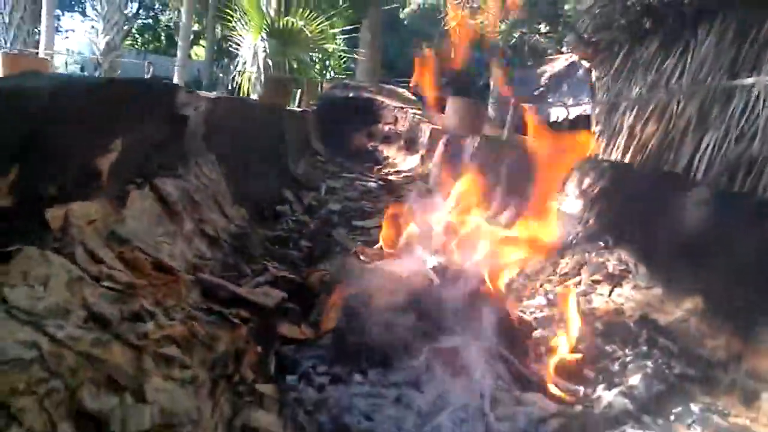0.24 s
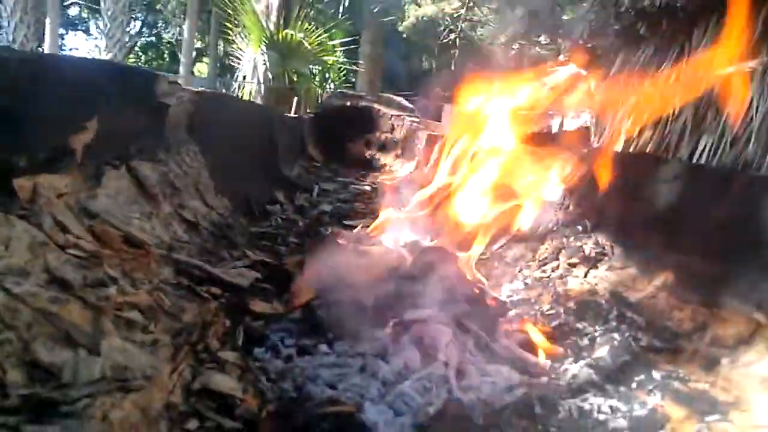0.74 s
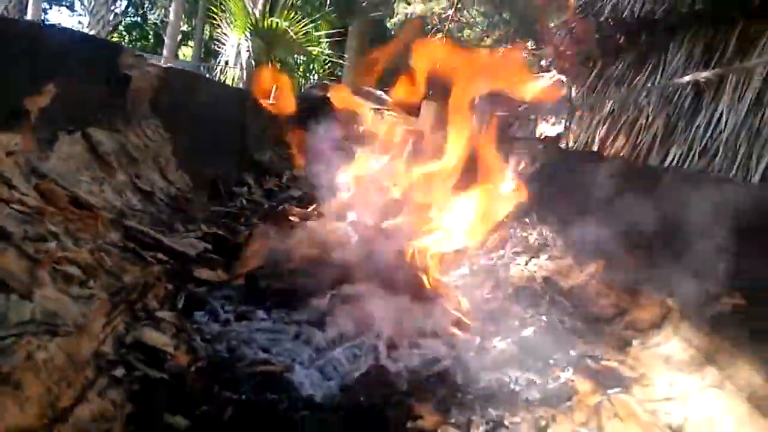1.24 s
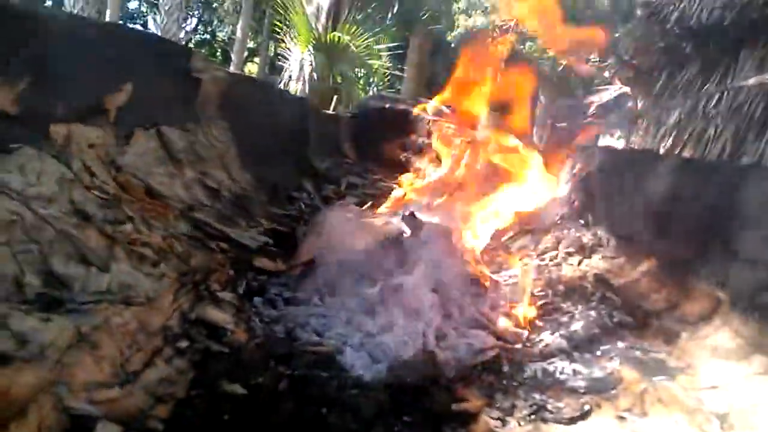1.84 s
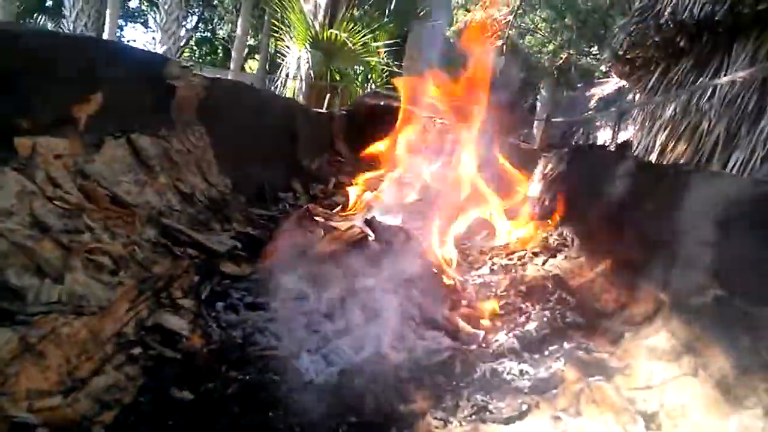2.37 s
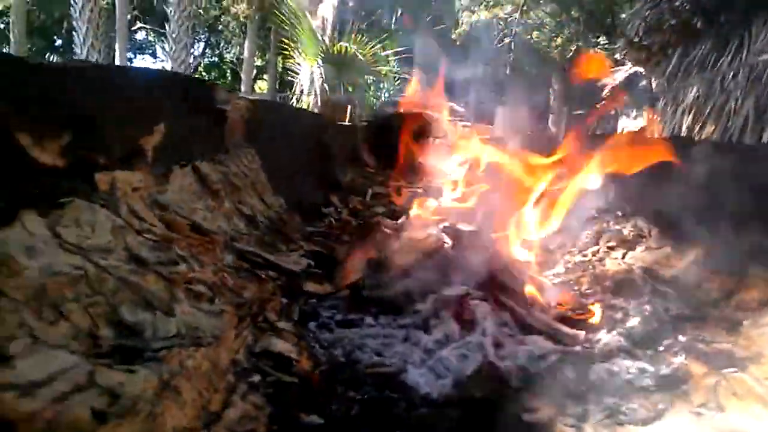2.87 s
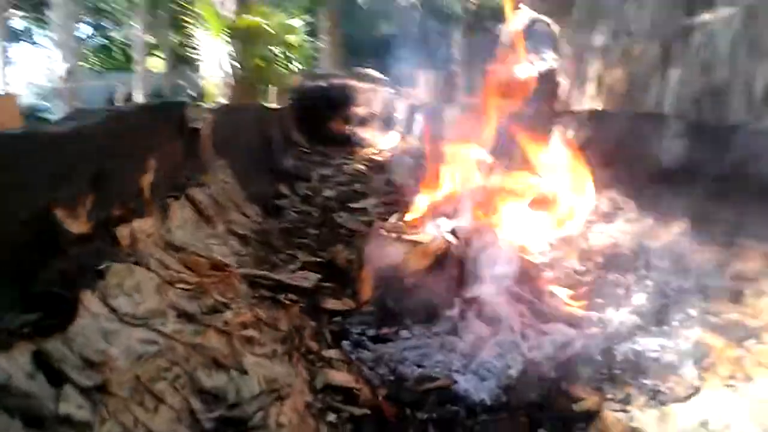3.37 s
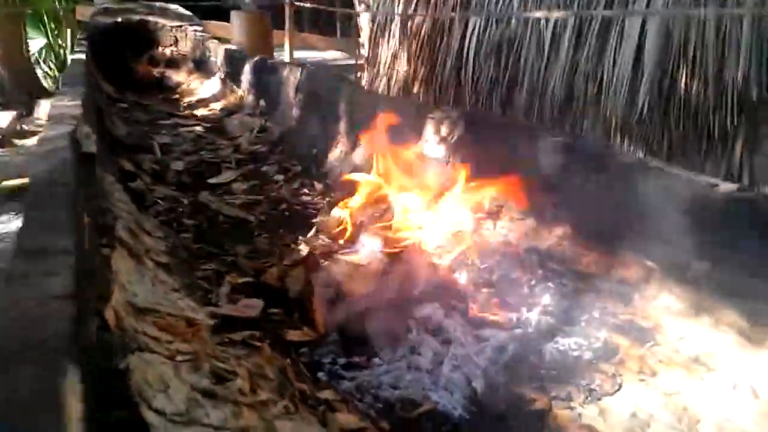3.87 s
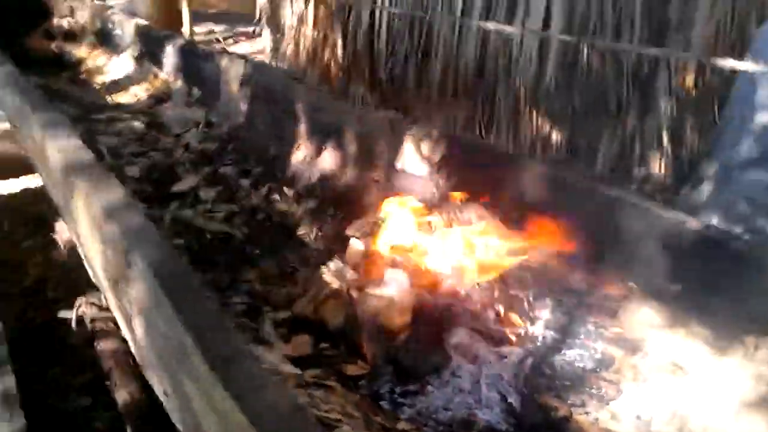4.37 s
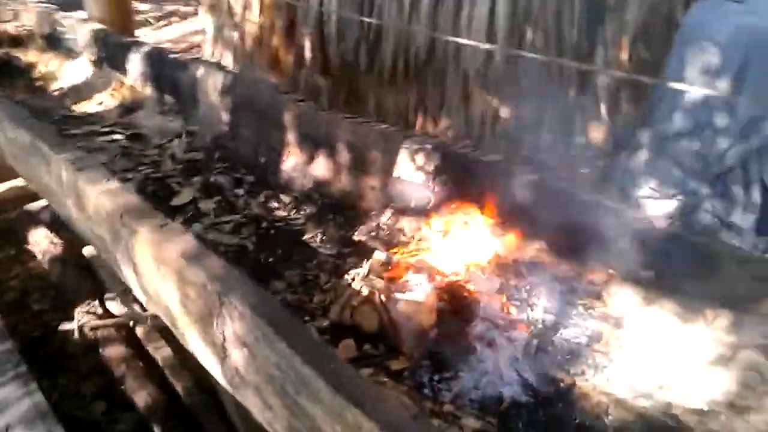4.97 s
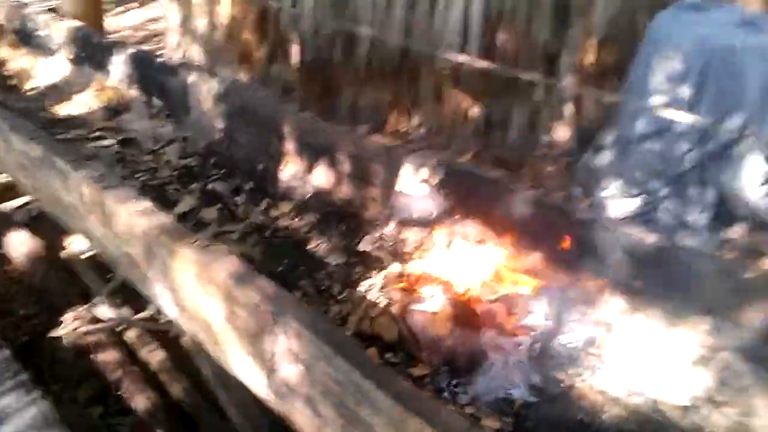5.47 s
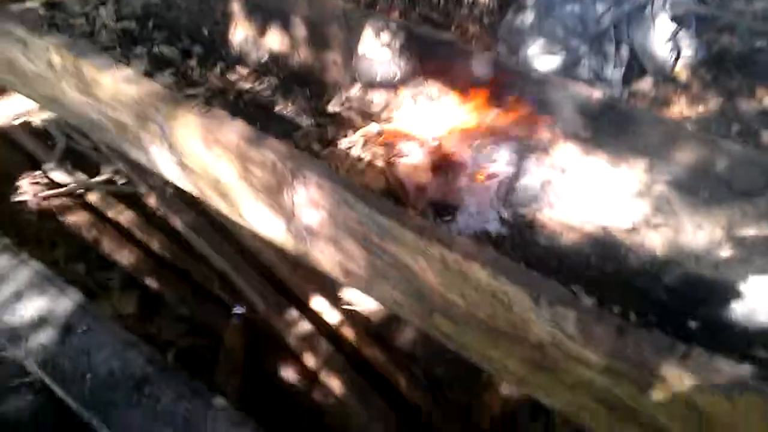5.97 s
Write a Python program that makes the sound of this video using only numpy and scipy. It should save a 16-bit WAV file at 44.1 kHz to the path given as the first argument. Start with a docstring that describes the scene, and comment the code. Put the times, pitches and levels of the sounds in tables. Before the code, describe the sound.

Outdoors among trees, a dense high cicada buzz dominates throughout, fluttering about ten times a second over distant insect hiss and faint leaves. Faint falling cheeps come first, then soft, low puffs of flame from a small fire. Near the end there is a far dove-like hoot, dry wood cracks, a swell in the buzz and a quick cluster of bumps on the handheld microphone.

```python
"""From the first moment two near cicadas throb about eleven and nine times a second, in and out of step, over
a steady chorus of clicking drums; far insects and foliage (shaped noise) and a small fire sound throughout.
The fire is rumbling noise and dull pulses; faint cheeps (falling sines) come early, then the stronger flaps.
Near the end come one long far hoot, perhaps a dove's (a wavering sine), snaps of wood (short noise bursts)
and the hand bumping and rubbing the microphone's case (damped thuds and ticks)."""
import sys
import numpy as np
from scipy import signal
from scipy.fft import rfft, irfft, next_fast_len
from scipy.io import wavfile
from scipy.ndimage import map_coordinates

SR = 44100
rng = np.random.default_rng(int(sys.argv[2]) if len(sys.argv) > 2 else 0)


def store_wav(level_fs):
    """Save 16-bit WAV to argv[1]."""
    pcm = np.round(np.clip(np.atleast_2d(level_fs), -1, 1) * 32767)
    wavfile.write(sys.argv[1], SR, pcm.T.astype(np.int16))


N = 274293


def from_db(db):
    """Decibels to gain."""
    return 10 ** (np.asarray(db) / 20)


def rms_one(x):
    """Scale to unit power."""
    return x / np.sqrt(np.mean(x ** 2) + 1e-20)


def peak_one(x):
    """Scale to unit height."""
    return x / (np.abs(x).max() + 1e-20)


def in_time(rows):
    """Draw each column of a timed table as a curve with a value at every sample."""
    s, *columns = np.transpose(rows)
    return [np.interp(np.arange(N) / SR, s, c) for c in columns]


def add(out, s, sound):
    """Mix a short sound in at time s."""
    i = int(np.clip(round(s * SR), 0, N - 1))
    out[i:i + len(sound)] += sound[:N - i]


def white():
    """White noise for the whole scene."""
    return rng.standard_normal(N)


def colour(x, spectrum):
    """Causal (minimum-phase) filter with the given spectrum."""
    size = next_fast_len(2 * (len(x) // 2) + 8192, real=True) // 2 * 2
    hz, db = np.transpose(spectrum)
    bins = np.maximum(np.arange(size // 2 + 1) * SR / size, 1)
    skirt_db = -40 * np.maximum(np.log2(hz[0] / bins), 0)  # 40 dB per octave below the first point
    gain_db = np.interp(np.log(bins), np.log(hz), db) + skirt_db
    # folding the cepstrum onto positive time makes the phase minimal
    cepstrum = irfft(np.log(from_db(gain_db)))
    cepstrum[1:size // 2] *= 2
    cepstrum[size // 2 + 1:] = 0
    response = np.exp(rfft(cepstrum))
    return irfft(rfft(x, size) * response)[:len(x)]


def drift(per_s):
    """Random wander of unit power: straight lines between per_s random knots a second."""
    knots = rng.standard_normal(4000)
    return rms_one(np.interp(np.arange(N) / SR * per_s, np.arange(len(knots)), knots))


def uneven_sizes(spread_db, deviates):
    """Click strengths of random size and either sign."""
    return from_db(spread_db * np.clip(deviates, -2, 2)) * rng.choice([-1, 1], len(deviates))


def grains(per_s, spread_db):
    """Clicks at random moments, of uneven size and either sign."""
    born = rng.random(N) < per_s / SR
    return born * uneven_sizes(spread_db, rng.standard_normal(N))


def crack(low_hz, high_hz, t60, splinter=1.0):
    """A sharp break with a short splintering tail, in one band; height 1."""
    t = np.arange(4096) / SR
    tail = splinter * rng.standard_normal(len(t)) * from_db(-60 * t / t60)
    band = signal.butter(2, [low_hz, high_hz], "band", fs=SR, output="sos")
    return peak_one(signal.sosfilt(band, (t == 0) + tail))


def thicket(x, count, echo_db, lag_s, sway_s):
    """Close reflections off the ground and logs comb the sound; their paths shift as the hand sways."""
    n, out = np.arange(N), x
    for k in range(count):
        lag = lag_s * (k + 1) ** 1.3 + sway_s * drift(5)
        out = out + from_db(echo_db) * map_coordinates(x, [n - lag * SR], order=3)
    return rms_one(out)


def tymbals(tone, count, ribs_per_s, jitter, uneven_db):
    """Each drum buckles rib by rib in a quick, loose run of clicks that sets the belly ringing."""
    clicks = np.zeros(N)
    for _ in range(count):
        gap, size = rng.standard_normal((2, 12000))
        at = (np.cumsum(np.exp(jitter * gap)) / ribs_per_s * SR).astype(int)
        strength = uneven_sizes(uneven_db, size)
        clicks += np.bincount(at[at < N], strength[at < N], N)
    return colour(clicks, tone)


# shape of every throb [shares of a beat]
THROB_RISE, THROB_HOLD, THROB_FALL = 0.25, 0.28, 0.27


def cicada(course, per_s, tone, ribs_per_s, gain_db, uneven_db=1.5, waver_db=0.67):
    """One near insect switches its buzz on and off once a beat; no two throbs are quite as strong."""
    lag_s, level_db = in_time(course)
    beats = per_s * (np.arange(N) / SR - lag_s) + .5
    phase, beat = beats % 1, np.maximum(beats, 0).astype(int)
    start = (1 - THROB_RISE - THROB_HOLD - THROB_FALL) / 2  # silence is split evenly around the throb
    rise, fall = (phase - start) / THROB_RISE, (1 - start - phase) / THROB_FALL
    throb = np.clip(np.minimum(rise, fall), 0, 1)
    beat_db = uneven_db * np.tanh(rng.standard_normal(beat.max() + 1))[beat]
    strength_db = beat_db + waver_db * drift(110)
    buzz = tymbals(tone, count=2, ribs_per_s=ribs_per_s, jitter=.3, uneven_db=2.5)
    buzz = thicket(buzz, count=3, echo_db=-10.0, lag_s=.0014, sway_s=.00008)
    return throb * from_db(level_db + gain_db + strength_db) * buzz


# course of each near cicada: (time [s], lag behind its beat [s], level before trim [dB])
QUICK_COURSE = [(0.0, 0.0082, -21), (0.8, 0.044, -21.5), (1.6, 0.056, -24), (2.65, 0.068, -18.5),
                (3.7, 0.067, -22.5), (4.1, 0.067, -26), (4.7, 0.064, -24), (5.0, 0.056, -17.5),
                (5.4, 0.065, -22), (5.85, 0.06, -13.5), (6.22, 0.06, -17)]
SLOW_COURSE = [(0.0, -0.055, -22.5), (1.6, -0.038, -20.5), (2.3, 0.00084, -25.5), (3.1, -0.051, -23),
               (3.7, -0.052, -21.5), (4.1, -0.048, -26), (4.7, -0.055, -25), (5.0, -0.063, -18),
               (5.4, -0.053, -21), (6.22, -0.048, -21.6)]
# ring of each one's drum and belly: (frequency [Hz], relative level [dB])
QUICK_RING = [(4000, -54), (5600, -29.5), (6000, -23), (6500, -12), (7000, -4), (7300, 1.5), (7900, 0.5),
              (8300, -3), (8650, -3.5), (9300, -8), (10600, -19), (13300, -27), (15600, -20.5)]
SLOW_RING = [(4000, -53), (5700, -29.5), (6500, -16.5), (7100, -3.5), (7700, 3), (8300, -2), (8700, 1.5),
             (9300, -6.5), (10600, -21.5), (13000, -21.5), (15600, -16)]


def near_cicadas():
    """In step, the two near insects pulse hard; out of step, they blur into an even buzz."""
    quick = cicada(QUICK_COURSE, per_s=11.4, tone=QUICK_RING, ribs_per_s=800, gain_db=0.8)
    slow = cicada(SLOW_COURSE, per_s=9.2, tone=SLOW_RING, ribs_per_s=760, gain_db=0.4)
    return quick + slow


# the chorus behind them: (time [s], level before trim [dB])
CHORUS_COURSE = [(0, -25.5), (1.7, -24), (2.5, -26.5), (3.7, -23.5), (4.7, -24.5), (5.0, -21.5),
                 (6.22, -21.5)]
# ring of the chorus: (frequency [Hz], relative level [dB])
CHORUS_RING = [(4000, -47.5), (5800, -24.5), (6500, -13.5), (7200, 0.5), (7900, -0.5), (8700, -3.5),
               (9500, -8), (10800, -16), (13500, -21), (15600, -18.5)]


def chorus(trim_db=-0.63, swell_db=1.0):
    """Many insects farther off merge into a steady buzz that fills the gaps."""
    level_db, = in_time(CHORUS_COURSE)
    crowd = tymbals(CHORUS_RING, count=4, ribs_per_s=600, jitter=.4, uneven_db=0.5)
    crowd = thicket(crowd, count=3, echo_db=-7.5, lag_s=.0019, sway_s=.00008)
    return from_db(level_db + trim_db + swell_db * drift(60)) * crowd


# how squarely the microphone faces the cicadas: (time [s], top treble gain [dB])
MIC_FACING = [(0, -1.5), (1.8, 1), (3.5, -1.5), (5.0, 0.5), (5.45, 0), (5.8, -4.5), (6.22, -3)]


def turned(x, corner_hz=10300):
    """The case shades the shortest waves as the hand turns it away."""
    facing_db, = in_time(MIC_FACING)
    top = signal.sosfiltfilt(signal.butter(4, corner_hz, "high", fs=SR, output="sos"), x)
    return x + (from_db(facing_db) - 1) * top


# the fire: (time [s], rumble level before trim [dB], flutter level before trim [dB])
FIRE_COURSE = [(0.0, -32.5, -32.5), (0.7, -34, -37.5), (1.3, -34.5, -37.5), (1.8, -33.0, -30.5),
               (2.6, -35.5, -36.5), (3.2, -33.5, -32.5), (3.7, -34, -34), (4.3, -35.5, -37),
               (5.0, -36, -42), (5.6, -36.5, -37), (6.22, -35.5, -45)]
# colour of the rumble, and of one flap of flame: (frequency [Hz], relative level [dB])
RUMBLE_COLOUR = [(12, 2), (25, 0), (60, 0.5), (80, -4), (110, -1.5), (170, -12), (300, -30), (700, -51)]
FLAP_COLOUR = [(30, -6), (80, -3.5), (140, 0.5), (230, -2.5), (320, -6.5), (450, -13.5), (700, -24),
               (1200, -37.5), (2500, -40.5)]
# the strongest flaps of flame: (time [s], peak level before trim [dB])
STRONG_FLAPS = [(1.556, -21.5), (1.751, -22), (2.092, -20.5), (2.279, -21.5), (2.993, -22.5), (3.298, -21),
                (3.723, -23.5), (3.916, -25)]


def flames(rumble_trim_db=-1.0, flutter_trim_db=-3.0, flap_trim_db=1.5, gust_db=2.0):
    """Rising hot gas rumbles; each tongue of flame that tears off gives a dull pressure pulse."""
    rumble_db, flutter_db = in_time(FIRE_COURSE)
    rumble = rms_one(colour(white(), RUMBLE_COLOUR))
    tongues = grains(per_s=420, spread_db=4.0) * from_db(gust_db * drift(20))
    flutter = rms_one(colour(tongues, FLAP_COLOUR))
    out = from_db(rumble_db + rumble_trim_db) * rumble + from_db(flutter_db + flutter_trim_db) * flutter
    pulse = peak_one(colour(signal.unit_impulse(4096), FLAP_COLOUR))
    for s, db in STRONG_FLAPS:
        add(out, s, -from_db(db + flap_trim_db) * pulse)
    return out


# snapping wood: (time [s], peak level [dB], low edge [Hz], high edge [Hz], 60 dB decay of the tail [s])
WOOD_SNAPS = [(4.6515, -6.5, 3500, 10100, 0.0017), (4.9816, -0.5, 4950, 12600, 0.0042),
              (5.548, -26, 302, 1400, 0.084), (5.906, -22, 477, 1520, 0.0071)]


def snaps():
    """Sticks split in the heat, each with a sharp crack and a splintering tail."""
    out = np.zeros(N)
    for s, db, low_hz, high_hz, t60 in WOOD_SNAPS:
        add(out, s, from_db(db) * crack(low_hz, high_hz, t60))
    return out


# the hand bumps and slips on the case:
# (time [s], thud level [dB], thud pitch [Hz], tick level [dB], tick centre [Hz])
HAND_BUMPS = [(4.848, -34, 45, -26, 900), (4.858, -19, 48, -26, 595), (4.859, -18.5, 266, -40, 520),
              (5.355, -23.5, 207, -48, 500), (6.132, -19, 171.2, -17.5, 1457),
              (6.139, -14, 163, -18.5, 1600), (6.151, -16, 140, -16, 1900), (6.159, -15, 146, -26, 1290),
              (6.1655, -16, 171, -19.5, 1300), (6.172, -22, 130, -20, 1000)]


def handling(ring_cycles=2.3, tick_spread=2.6):
    """Each slip of the hand gives a tick and a heavily damped thud of the case."""
    out, t = np.zeros(N), np.arange(4096) / SR
    for s, thud_db, hz, tick_db, tick_hz in HAND_BUMPS:
        decay = np.exp(-np.log(1000) * t * hz / ring_cycles)  # down 60 dB after ring_cycles
        thud = peak_one(np.sin(2 * np.pi * hz * t) * decay)
        tick = crack(tick_hz / tick_spread, tick_hz * tick_spread, t60=0.012)
        add(out, s, from_db(tick_db) * tick - from_db(thud_db) * thud)
    return out


# the far hoot: (time [s], pitch [Hz], level [dB])
HOOT_COURSE = [(4.6, 528, -63), (4.76, 523, -52), (4.95, 518, -50.5), (5.2, 521, -50.5), (5.47, 521, -54),
               (5.55, 542, -71)]


def hoot(waver_hz=0.9, waver_db=1.0):
    """One long, soft, nearly pure note from far among the trees."""
    hz, level_db = in_time(HOOT_COURSE)
    phase = 2 * np.pi * np.cumsum(hz + waver_hz * drift(17)) / SR
    return np.sqrt(2) * from_db(level_db + waver_db * drift(23)) * np.sin(phase)


# faint far cheeps: (time [s], length [s], start pitch [Hz], end pitch [Hz], level at the crest [dB])
FAR_CHEEPS = [(0.095, 0.12, 3430, 3280, -47), (0.158, 0.091, 3230, 3130, -42.5),
              (1.419, 0.14, 1520, 1470, -51.5)]


def cheeps(warble_hz=70):
    """Short falling whistles, blurred by distance: sines with a quick random warble."""
    out = np.zeros(N)
    for s, length, start_hz, end_hz, db in FAR_CHEEPS:
        size = int(length * SR)
        hz = np.linspace(start_hz, end_hz, size) + warble_hz * drift(250)[:size]
        whistle = np.sqrt(2) * np.sin(2 * np.pi * np.cumsum(hz) / SR)
        add(out, s, from_db(db) * np.hanning(size) * whistle)
    return out


# the wood: (time [s], far insects' level before trim [dB], foliage level before trim [dB])
WOOD_COURSE = [(0.0, -41, -55), (1.3, -40.9, -55), (1.8, -41, -49.5), (2.5, -41.5, -54.5),
               (3.3, -41, -54.5), (4.0, -40.0, -49), (4.8, -38, -46.5), (5.5, -37.5, -47.5),
               (6.22, -35.8, -45.5)]
# colour of the far insects, and of the foliage: (frequency [Hz], relative level [dB])
INSECT_COLOUR = [(1600, -23), (2050, -14.5), (2350, -1.5), (2630, 3.5), (2900, 1.5), (3300, 2), (3500, 1),
                 (3750, 3), (4100, 2), (4500, 6), (4850, 6.5), (5300, 2), (6500, -0.5), (9000, -9.5)]
LEAF_COLOUR = [(300, -13.5), (550, 0.5), (900, 2), (1300, -1), (2000, 0.5), (3000, -10), (6000, -26)]


def wood(insects_trim_db=-1.5, leaves_trim_db=-2.5, stir_db=2.8, hush_db=5.0):
    """Distant insects merge into a hiss; beneath it the foliage stirs unevenly."""
    insects_db, leaves_db = in_time(WOOD_COURSE)
    insects = thicket(colour(white(), INSECT_COLOUR), count=3, echo_db=-9.5, lag_s=.0021, sway_s=.00012)
    stirring_db = stir_db * np.tanh(drift(16)) + hush_db * np.tanh(drift(40))
    leaves = rms_one(from_db(stirring_db) * colour(white(), LEAF_COLOUR))
    return from_db(insects_db + insects_trim_db) * insects + from_db(leaves_db + leaves_trim_db) * leaves


def scene():
    """Everything reaches one microphone, so both channels are alike."""
    cicadas = turned(near_cicadas() + chorus())
    mono = cicadas + flames() + snaps() + handling() + hoot() + cheeps() + wood()
    return np.array([mono, mono])


# colour of a faint noise that differs between left and right: (frequency [Hz], relative level [dB])
SIDE_NOISE_COLOUR = [(40, -8), (500, -4), (1200, -36), (2600, 5), (5000, 12.5), (7500, -23), (11000, -8),
                     (15500, 10)]


def record(dry, noise_db=-53, cutoff_hz=15700):
    """A faint coloured noise, different in each channel, is added; the top is cut steeply."""
    noise = np.array([rms_one(colour(white(), SIDE_NOISE_COLOUR)) for _ in dry])
    steep_cut = signal.ellip(16, .1, 100, cutoff_hz, fs=SR, output="sos")
    return signal.sosfilt(steep_cut, dry + from_db(noise_db) * noise)


dry = scene()
out = record(dry)
store_wav(out)
```